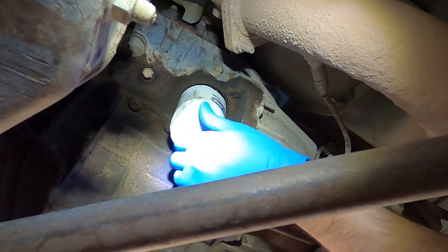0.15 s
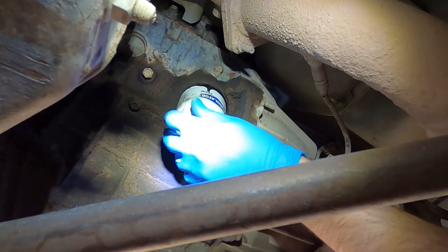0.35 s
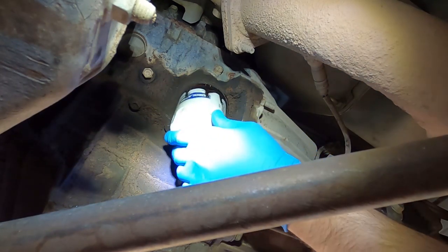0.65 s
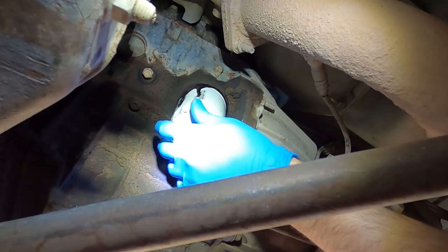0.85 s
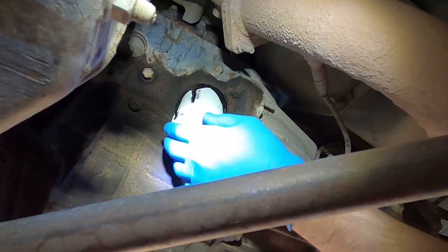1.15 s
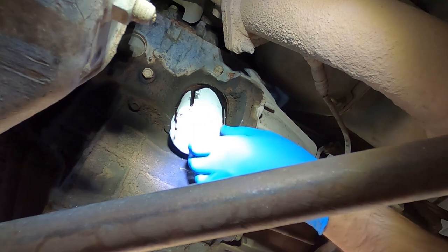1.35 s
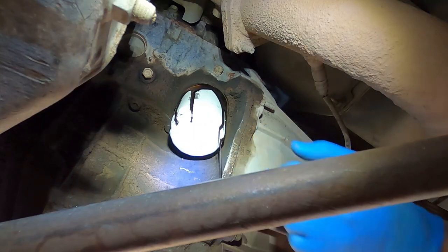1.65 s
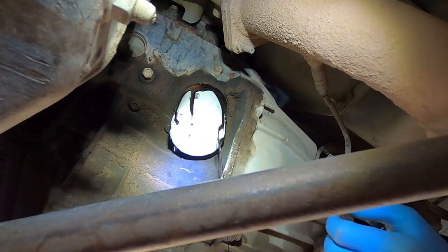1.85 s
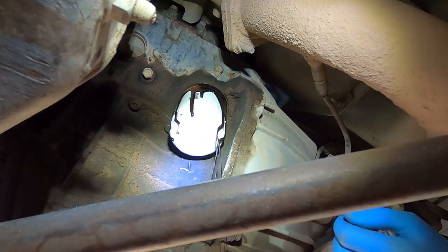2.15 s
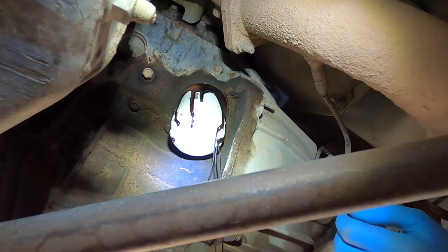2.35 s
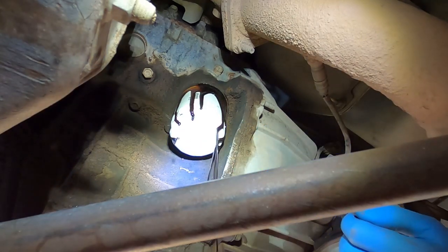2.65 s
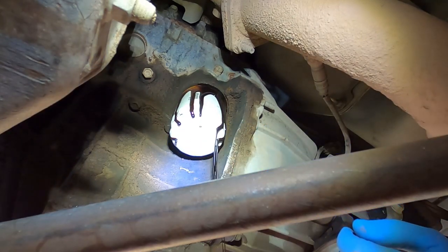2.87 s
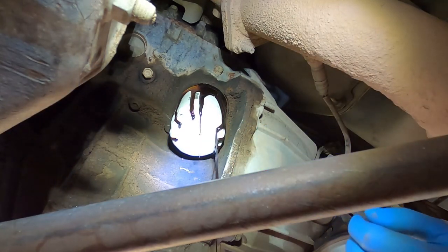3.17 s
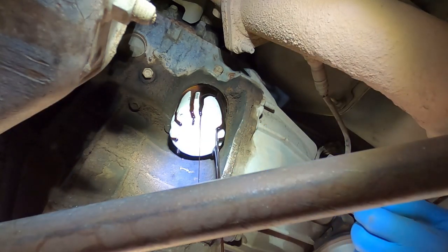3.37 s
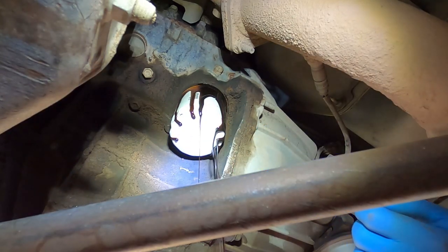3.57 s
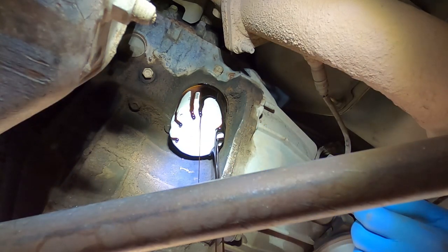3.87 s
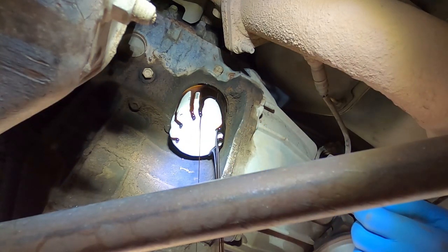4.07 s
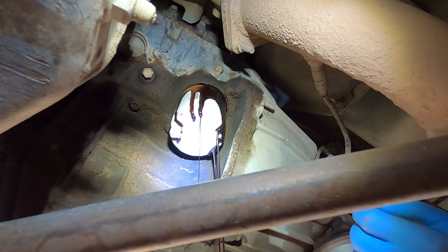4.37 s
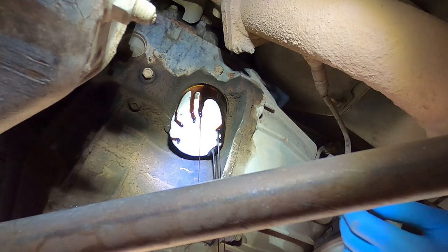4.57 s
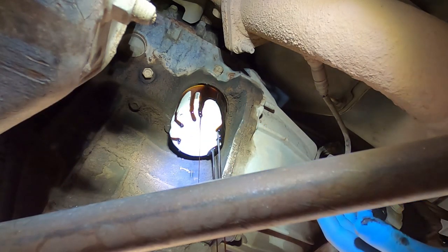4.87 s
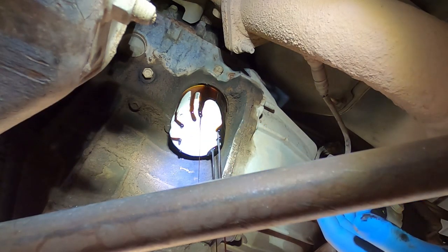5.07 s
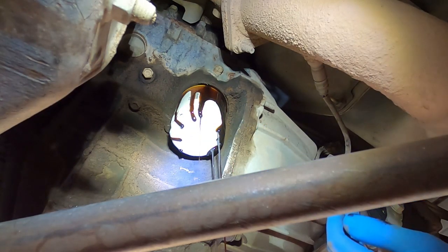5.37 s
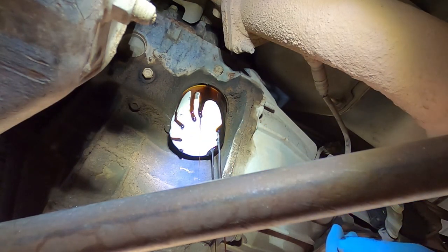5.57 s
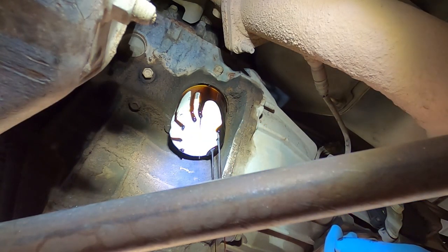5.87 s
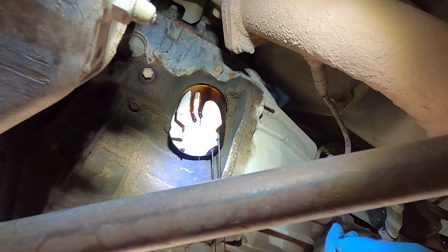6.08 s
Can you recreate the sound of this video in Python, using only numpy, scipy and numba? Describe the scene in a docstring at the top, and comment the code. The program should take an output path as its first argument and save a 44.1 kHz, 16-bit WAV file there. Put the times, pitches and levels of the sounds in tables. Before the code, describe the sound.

Motors hum low in a quiet garage while a gloved hand loosens an oil filter with faint rubs, light clicks and one sharp metal knock. Separate drops then plink into a drain pan and build into a thin, bubbling, spattering stream that grows louder. It is all heard from close by, in the tight space beneath a vehicle.

```python
"""Oil change in a garage

Under a vehicle a gloved hand spins an oil filter loose: the glove rubs, the can knocks on its thread.
Oil drips, then streams into a drain pan; each drop plops as trapped bubbles and rings the pan,
and fine spatter ticks high. A few soft thuds sound, and the underbody echoes it all briefly.
Motors nearby hum low over the quiet garage air."""
import sys
import numpy as np
from scipy import signal
from scipy.fft import rfft, irfft
from scipy.io import wavfile
from scipy.ndimage import uniform_filter1d
from numba import njit

SR = 44100
rng = np.random.default_rng(int(sys.argv[2]) if len(sys.argv) > 2 else 0)


def wav_out(sig):
    """Save sig, one row per channel (or a flat mono array), as 16-bit PCM at SR to the path in sys.argv[1]."""
    wavfile.write(sys.argv[1], SR, np.round(np.clip(np.atleast_2d(sig).T, -1, 1) * 32767).astype(np.int16))


N = 274743
TIME = np.arange(N) / SR
SIDE = np.array([[1], [-1]])  # adds on the left, subtracts on the right

# the oil's flow: (time [s], gurgle level [dB], spray level [dB], gurgle pitch [Hz])
OIL_FLOW = [(1.945, -65, -46.5, 1820), (2.03, -56.5, -58.5, 1770), (2.13, -53, -54, 1780),
            (2.18, -76, -72.5, 1720), (2.3, -66, -59.5, 2380), (2.56, -73, -64, 2240),
            (2.8, -54, -55.5, 1790), (3.07, -61.5, -61, 1525), (3.36, -47.5, -46.5, 1570),
            (3.5, -61, -60, 1540), (3.62, -51.5, -53.5, 1290), (3.7, -47.5, -49, 1320),
            (3.8, -51, -51, 1183), (4.24, -53.5, -53.5, 1280), (4.47, -47.5, -49, 1262),
            (4.95, -43.5, -48, 1280), (5.15, -41, -48, 1535), (6.0, -43.5, -48.5, 1500),
            (6.23, -39.5, -46, 1535)]
FLOW_START_S = OIL_FLOW[0][0]


def oil():
    """Drops, stream and patter land in the pan; the stream pauses now and then."""
    # pauses in the stream: (time [s], dip [dB], half length [s])
    lulls = [(2.496, -17, 0.023), (3.197, -21, 0.01), (3.353, -29, 0.036), (3.579, -6, 0.018),
             (3.893, -12, 0.008), (4.025, -13, 0.015), (4.485, -25, 0.0081), (5.21, -9.5, 0.0065),
             (5.476, -19, 0.0088), (5.686, -8, 0.0092)]
    lull_db = sum(dip * np.exp(-((TIME - at) / half) ** 4) for at, dip, half in lulls)
    gurgle_db, spray_db, gurgle_hz = curve(OIL_FLOW)
    gurgle_db, spray_db = gurgle_db + lull_db, spray_db + lull_db
    return drain_pan(drops(spray_db) + stream(gurgle_db, spray_db, gurgle_hz) + patter(spray_db))


def drops(spray_db, strays_from_s=3.2):
    """Each drop plops and splashes; strays land beside the stream, following the spray's level."""
    # bubbles that stand out as drops land: (time [s], level [dB], pitch [Hz])
    landings = [(1.952, -31.5, 1750), (1.96, -36.5, 2070), (1.985, -33, 1744), (2.0262, -48, 1964),
                (2.0345, -37, 8300), (2.044, -47, 1700), (2.091, -44, 2100), (2.202, -49, 1700),
                (2.221, -49, 2390), (2.079, -48.5, 4200), (2.089, -45.5, 8300), (2.119, -35, 1590),
                (2.127, -48.5, 9500), (2.2534, -27, 2745), (2.262, -38, 3090), (2.2923, -49, 4480),
                (2.279, -48.5, 6160), (2.335, -52, 3570), (2.353, -51, 6140), (2.3793, -38.5, 2415),
                (2.379, -44, 4750), (2.4338, -31, 2900), (2.437, -42.5, 4930), (2.463, -49.5, 2170),
                (2.478, -50, 2060), (2.4938, -43.5, 6530), (2.527, -55, 2060), (2.541, -51, 4270),
                (2.5493, -39, 4610), (2.573, -44, 4550), (2.6035, -44.5, 3650), (2.632, -46, 2500),
                (2.6472, -38.5, 2730), (2.677, -47, 2390), (2.647, -35, 3540), (2.71, -49, 11300),
                (2.717, -38, 3570), (2.7394, -39, 3370), (2.7518, -33, 2250), (2.802, -44.5, 4230),
                (2.812, -35, 1510), (2.825, -37, 3600), (2.827, -37, 2140), (2.867, -42, 2070),
                (2.832, -33, 2730), (2.834, -44, 10200), (2.856, -41.5, 10100), (2.891, -33.5, 1540),
                (2.89, -35.5, 4760), (2.9255, -27.5, 3730), (2.9274, -26, 2270), (2.973, -32.5, 11640),
                (2.981, -53, 12400), (2.9729, -33, 2307), (3.0272, -49, 2100), (3.036, -40.5, 1650),
                (3.042, -45.5, 8000), (3.054, -48, 4280), (3.075, -36, 1470), (3.078, -43, 6640),
                (3.116, -45.5, 3780), (3.136, -39.5, 5040), (3.146, -41, 1510), (3.192, -39, 4130),
                (3.124, -35.5, 1500), (3.177, -35, 1476), (3.219, -33, 4020), (3.2473, -36.5, 1590),
                (3.2842, -32.5, 1690), (3.299, -32, 1386), (3.2966, -25, 3880), (3.299, -36, 7830),
                (3.4, -28.5, 1590), (3.418, -38.5, 3900), (3.43, -34.5, 6420), (3.481, -33.5, 1680),
                (3.549, -32, 5270), (3.5663, -39, 3390), (3.616, -39, 1320), (3.626, -34, 1264),
                (3.642, -34, 1205), (3.676, -33.5, 1550), (3.7249, -32.5, 2100), (3.7611, -31, 1070),
                (3.6867, -30.5, 2240), (3.778, -44, 1120), (3.773, -28.5, 3210), (3.8106, -14, 1183),
                (3.8096, -31, 4290), (3.811, -17.5, 2043), (3.833, -31.5, 3380), (3.8524, -36.5, 7120),
                (3.9276, -31, 4920), (3.9307, -35.5, 3920), (3.9328, -33, 2530), (3.985, -22.5, 1220),
                (4.042, -30, 1165), (4.047, -40.5, 7650), (4.0938, -46, 1640), (4.155, -34, 2570),
                (4.2441, -33, 1210), (4.261, -44, 4220), (4.301, -34.5, 5240), (4.306, -33, 2630),
                (4.3425, -35, 2140), (4.347, -33, 5070), (4.3523, -29, 2150), (4.3793, -23.5, 1714),
                (4.432, -36, 4360), (4.464, -42, 5530), (4.494, -39, 1625), (4.4979, -29, 4360),
                (4.511, -41, 8600), (4.54, -42, 1460), (4.552, -35.5, 4080), (4.573, -30.5, 1550),
                (4.654, -32, 8440), (4.681, -29.5, 1375), (4.733, -38, 11400), (4.812, -32, 4390),
                (4.9193, -32.5, 3900), (4.967, -34.5, 8440), (5.009, -34.5, 4480), (5.0673, -31, 1470),
                (5.0838, -23.5, 1213), (5.092, -39, 9100), (5.2404, -31, 5680), (5.241, -24.5, 1685),
                (5.173, -36, 7340), (5.41, -40, 12200), (5.441, -27.5, 5430), (5.4988, -37, 11600),
                (5.506, -32, 1720), (5.538, -29, 1446), (5.6028, -31, 1690), (5.6608, -25, 1483),
                (5.751, -31.5, 3630), (5.768, -34.5, 9530), (5.774, -24, 1462), (5.782, -24, 2114),
                (5.9327, -26, 1610), (5.965, -25, 1398), (5.985, -35, 11500), (6.007, -34.5, 11940),
                (6.0085, -25.5, 7850), (6.041, -27.5, 1456), (6.066, -29, 3720), (6.096, -28.5, 1160),
                (6.13, -29, 1230), (6.1423, -26, 1455)]
    # lone drops ring longer than drops in the churned pool: (time [s], t60 at 1500 Hz [s])
    ring_times = [(2.2, 0.031), (3.0, 0.02), (6.0, 0.02)]
    s, db, hz = np.transpose(landings)
    timing, tuning, strength = rng.random((24, 3)).T
    stray_s = strays_from_s + (N / SR - .05 - strays_from_s) * timing
    s = np.append(s, stray_s)
    hz = np.append(hz, 1500 * 4 ** tuning)
    db = np.append(db, spray_db[samples(stray_s)] + 8.5 + 5 * strength)
    t60 = np.interp(s, *np.transpose(ring_times)) * (1500 / hz) ** 0.21
    splash_db = db - 15.5 + 2.9 * np.log2(hz / 1500)
    return plops(s, db, hz, t60) + splashes(s, splash_db, 1.13 * hz, t60=0.028, octaves=0.38)


def plops(s, db, hz, t60, count=4):
    """A landing frees a few bubbles near one pitch within milliseconds; small ones stray more in pitch."""
    timing, tuning, rise = rng.random((len(s), count, 3)).transpose(2, 0, 1)
    order, hz = np.arange(count), hz[:, None]
    start = samples(s[:, None] + 0.004 * (1500 / hz) ** 0.5 * timing * order)
    spread = 0.042 * (hz / 1500) ** 0.634
    pitch = hz * (1 + spread * (2 * tuning - 1) * (order > 0))
    size = undb(db[:, None] + 0.5 - 2.84 * order)
    return bubbles(start.ravel(), pitch.ravel(), np.repeat(t60, count), size.ravel(),
                   glide=0.17 * rise.ravel(), rise_cycles=1.34)


def splashes(s, db, hz, t60, octaves):
    """A landing throws a short hiss around its pitch; the highs spread wider in stereo."""
    out = 0
    for centre in 800 * 2 ** np.arange(0, 4.3, .5):
        hits = np.zeros(N)
        np.add.at(hits, samples(s), undb(db - 4.3 * (np.log2(hz / centre) / octaves) ** 2) ** 2)
        power = signal.lfilter([1], [1, -1000 ** (-2 / (t60 * SR))], hits)
        power = uniform_filter1d(power, size=264, origin=131)  # six milliseconds to spread
        mid, side = steep_band(rng.standard_normal((2, N)), centre, centre / 1.18) / np.sqrt(centre / SR)
        out = out + np.sqrt(np.abs(power)) * (mid + min(centre / 20000, 1) * side * SIDE)
    return out


def stream(gurgle_db, spray_db, gurgle_hz):
    """The stream breaks up, so its gurgle and spray bubble in shared bursts."""
    # the thicker the stream, the less it breaks up: (time [s], share [0-1])
    breakup = [(2.4, 0.9), (3.2, 0.42), (5.0, 0.3)]
    flutter = walk(28)
    burst = (flutter - uniform_filter1d(flutter, size=9000)) * curve(breakup)[0]
    gurgle = bubble_rain(gurgle_db - 1.5 + 6.3 * burst, 0.86 * gurgle_hz,
                         octaves=1.6, cycles=20.4, scatter_db=3, count=3000)
    plips = bubble_rain(gurgle_db + 0.3 + 4.3 * burst, 0.9 * gurgle_hz,
                        octaves=0.585, cycles=41.6, scatter_db=3.5, count=700)
    spray = bubble_rain(spray_db - 0.5 + 8.2 * burst, 3000,
                        octaves=2.46, cycles=20, scatter_db=5, count=1400)
    pings = bubble_rain(spray_db + 4 + 6 * burst, 1900,
                        octaves=1.913, cycles=43.6, scatter_db=3.5, count=700)
    spatter = bubble_rain(spray_db + 9.5 * burst, 3500,
                          octaves=2.32, cycles=22, scatter_db=5.5, count=1200)
    glug = bubble_rain(gurgle_db - 11 + 10.3 * burst, 0.45 * gurgle_hz,
                       octaves=0.98, cycles=11.6, scatter_db=4, count=900)
    return glug + gurgle + plips + pings + spray + spatter * SIDE  # spatter lands all over the pan


def bubble_rain(db, lowest_hz, octaves, cycles, scatter_db, count):
    """Small bubbles ring at random times, their strength following the flow."""
    timing, tuning, strength = rng.random((count, 3)).T
    start = samples(FLOW_START_S + (N / SR - FLOW_START_S) * timing)
    pitch = np.broadcast_to(lowest_hz, N)[start] * 2 ** (octaves * tuning ** 1.618)
    size = undb(db[start] - scatter_db * np.log(1 - .97 * strength))
    return bubbles(start, pitch, cycles / pitch, size, glide=np.full(count, .08), rise_cycles=0.65)


@njit
def bubbles(start, hz, t60, size, glide, rise_cycles):
    """Sines that swell quickly, decay and rise in pitch as the cavity closes."""
    out = np.zeros(N)
    for k in range(len(start)):
        length, phase = int(t60[k] * SR), 0.
        for i in range(min(length, N - start[k])):
            phase += 2 * np.pi * min(hz[k] * (1 + glide[k] * i / length) / SR, .45)
            swell = 1 - np.exp(-phase / (2 * np.pi * rise_cycles))
            out[start[k] + i] += size[k] * swell * np.sin(phase) * 1000. ** (-i / length)
    return out


def patter(spray_db):
    """Tiny splashes crowd together as the stream thickens."""
    timing, strength, tuning = rng.random((300, 3)).T
    s = FLOW_START_S + (N / SR - FLOW_START_S) * timing ** 0.47
    db = spray_db[samples(s)] - 10.5 + 11 * strength
    return splashes(s, db, 2200 * 2 ** (1.68 * tuning), t60=0.054, octaves=0.72)


def drain_pan(liquid):
    """Lightly damped walls: every mode answers what lands near its pitch."""
    # the pan's resonances: (pitch [Hz], width [Hz], gain [dB])
    pan_modes = [(1190, 76, 4.5), (1630, 160, 4.5), (2195, 89, 2.5), (2610, 560, 1), (3576, 200, 5),
                 (4410, 330, 6.5), (5340, 114, 5), (5900, 190, -5), (6870, 620, -5.5), (8550, 680, -5.5),
                 (12000, 170, -3)]
    return liquid + sum(undb(db) * band(liquid, hz, width) for hz, width, db in pan_modes)


def filter_can():
    """Rough pushes ring the filter can's modes, damped by the grip."""
    # the can knocks on its thread: (time [s], peak [dB], contact [ms], scrape [ms])
    knocks = [(0.384, -49, 0.083, 1.9), (0.416, -47, 0.17, 2.9), (0.456, -38, 0.18, 3.3),
              (0.799, -27, 0.095, 4.5), (0.829, -18, 0.086, 0.69), (0.843, -32, 0.14, 4.2),
              (0.852, -43, 0.32, 2.6), (0.87, -37, 0.3, 5.2), (0.888, -41, 0.52, 3.9),
              (1.287, -35.5, 0.11, 13)]
    # the can's resonances: (pitch [Hz], gain [dB], nominal ring time [s])
    can_modes = [(648, -3, 0.36), (720, -5, 0.18), (1004, 0, 0.23), (1134, -2.5, 0.14), (1356, -7, 0.11),
                 (1570, -9.5, 0.086), (2470, -9.5, 0.041), (2750, -11, 0.13), (2960, -5, 0.23),
                 (4030, -11, 0.11), (4280, -13, 0.16)]
    out, t = np.zeros(N), np.arange(int(.3 * SR)) / SR
    for s, db, contact_ms, scrape_ms in knocks:
        after = np.maximum(t - scrape_ms / 1000, 0)
        envelope = 1000 ** (-after / 0.023) + 0.2 * 1000 ** (-after / 0.21)
        scrape = rng.standard_normal(len(t)) * envelope
        scrape[0] += 16 / scrape_ms  # a short touch starts with a crack
        ring = undb(-34) * scrape
        for hz, gain_db, ring_s in can_modes:
            gripped_s = 0.19 * min(ring_s, .3) * (900 / hz) ** 0.18
            ring += undb(gain_db) * band(scrape, hz, 3.3 / gripped_s)
        soft = np.exp(-1000 / (contact_ms * SR))
        ring = signal.lfilter([1], [1, -2 * soft, soft ** 2], ring)  # a longer contact dulls the blow
        start = int(s * SR)
        out[start:start + len(t)] += undb(db) * ring / np.abs(ring).max()
    return out


def glove(rise_db_per_s=348, fall_db_per_s=264):
    """The glove slides on the can; each rub swells and fades as dense ticks."""
    # the height of each rub: (time [s], level [dB])
    rubs = [(0.025, -70), (0.085, -80), (0.19, -75), (0.35, -64), (0.432, -64), (0.61, -64), (0.89, -70.5),
            (1.01, -72), (1.25, -69.5), (1.39, -69.5), (1.82, -74)]
    envelope_db = np.max([db + np.minimum(rise_db_per_s * (TIME - s), fall_db_per_s * (s - TIME))
                          for s, db in rubs], axis=0)
    ticks = rng.standard_normal(N) * undb(3.3 * rng.exponential(size=N))
    return level(steep_band(ticks, 4500, 9000), envelope_db)


def thuds(hollow_hz=631):
    """Dull bumps that also stir one hollow ring."""
    # soft low bumps: (time [s], level [dB], pitch [Hz])
    bumps = [(0.829, -35, 178), (0.846, -39, 232), (2.329, -54, 329), (2.576, -52, 339), (2.943, -50, 345),
             (3.93, -53, 420), (3.974, -54, 376)]
    s, db, hz = np.transpose(bumps)
    start, flat = samples(s), np.zeros(len(s))
    body = bubbles(start, hz, 20 / hz, undb(db + 11), glide=flat, rise_cycles=0.66)
    hollow = bubbles(start, flat + hollow_hz, flat + 0.07, undb(db + 1.5), glide=flat, rise_cycles=0.66)
    return body + hollow


def underbody(near, t60=0.1, echo_db=-11):
    """The vehicle's underside adds short, dense echoes that differ left and right."""
    t = np.arange(int(.3 * SR)) / SR
    mid, side = rng.standard_normal((2, len(t))) * 1000 ** (-t / t60) * np.clip(t / 0.00017, 0, 1)
    side = side - band(side, 270, 1200)  # low echoes reach both sides alike
    mid = signal.lfilter([.4], [1, -.6], mid)  # high echoes do not
    tails = undb(echo_db) * (mid + 0.67 * side * SIDE) / np.sqrt(np.sum(mid ** 2))
    direct = np.array([np.roll(near[0], 1), near[1]])  # the left lags by one sample
    return direct + signal.fftconvolve(direct, tails, axes=1)[:, :N]


def stereo_shading(near):
    """The upper mids lean left and the top leans right."""
    # balance across the spectrum: (frequency [Hz], left minus right [dB])
    balance = [(700, 1.5), (1300, -0.5), (2400, 4.5), (4400, 0.2), (8000, -2), (13000, -3)]
    hz, db = np.transpose(balance)
    tilt_db = np.interp(np.log(np.arange(N // 2 + 1) * SR / N + 1), np.log(hz), db) / 2
    return irfft(rfft(near) * undb(tilt_db * SIDE), N)


def motors(hum_hz=56.75, in_step_s=3.27):
    """Three motors at nearly the same speed beat together among narrow drones."""
    # the motors' tones: (offset above hum_hz [Hz], level [dB])
    tones = [(0, -39.5), (0.731, -49.5), (1.934, -48)]
    # bands of droning noise: (pitch [Hz], width [Hz], starting level [dB], drift [dB/s])
    drone_bands = [(47.2, 5.1, -65, -3.5), (81.1, 3.9, -50, -2), (106.66, 5.8, -49, -1),
                   (119.44, 4.1, -50.5, -0.5), (125.25, 2.6, -52, 0.39), (165.26, 4.8, -45.5, -2.5),
                   (171.1, 5.2, -57, 0), (236.6, 6.3, -64, -0.5), (4850, 460, -86, 1)]
    t = TIME - in_step_s
    hum = sum(np.sqrt(2) * undb(db) * np.sin(2 * np.pi * (hum_hz + beat) * t) for beat, db in tones)
    drones = sum(level(steep_band(rng.standard_normal(N), hz, width), db + drift * TIME)
                 for hz, width, db, drift in drone_bands)
    wide_rumble = level(band(rng.standard_normal(N), 60, 40), -62) * SIDE
    return (hum + drones) * undb(.35 * SIDE) + wide_rumble


def garage_air(level_db=-44.5):
    """Room tone in half-octave bands that flicker; the bass is alike left and right."""
    # the room tone's colour: (frequency [Hz], relative level [dB])
    colour = [(15, -34), (25, 1), (64, -2.5), (120, -6), (169, -11), (285, -22.5), (750, -34), (950, -34),
              (1080, -31.5), (3420, -56.5), (8550, -57), (13000, -99)]
    out, (colour_hz, colour_db) = 0, np.transpose(colour)
    for hz in 40 * 2 ** np.arange(0, 8.5, .5):
        mid, side = steep_band(rng.standard_normal((2, N)), hz, hz / 2)
        db = np.interp(np.log(hz), np.log(colour_hz), colour_db) + 0.98 * walk(3.784)
        out = out + undb(db) * (mid + min(hz / 1830, 1) * side * SIDE)
    return level(out, level_db)


def undb(db):
    return 10 ** (np.asarray(db) / 20)


def level(x, db):
    return x * undb(db) / np.sqrt(np.mean(x ** 2))


def samples(s):
    return (s * SR).astype(np.int64)


def curve(table):
    """A timed table's columns at every sample."""
    s, *columns = np.transpose(table)
    return [np.interp(TIME, s, column) for column in columns]


def band(x, hz, width):
    """Two-pole resonance, gain 1 at the centre."""
    return signal.lfilter(*signal.iirpeak(hz, hz / width, SR), x)


def steep_band(x, hz, width):
    return band(band(x, hz, width), hz, width)


def walk(rate_hz):
    """A slow wander: random steps, smoothed twice."""
    hold = int(SR / rate_hz)
    steps = np.repeat(rng.standard_normal(N // hold + 1), hold)
    return 2.22 * uniform_filter1d(uniform_filter1d(steps, hold), hold)[:N]


def scene():
    """Near sounds echo under the vehicle; hum and air fill the garage."""
    near = undb(-4.5) * oil() + filter_can() + glove() + thuds()
    return stereo_shading(underbody(near)) + motors() + garage_air()


def record(dry, dull_hz=13000, top_hz=15500):
    """The treble is softened and the very top cut off."""
    dull = signal.sosfilt(signal.butter(2, dull_hz, fs=SR, output="sos"), dry)
    return signal.sosfilt(signal.ellip(10, .2, 80, top_hz, fs=SR, output="sos"), dull)


dry = scene()
out = record(dry)
wav_out(out)
```